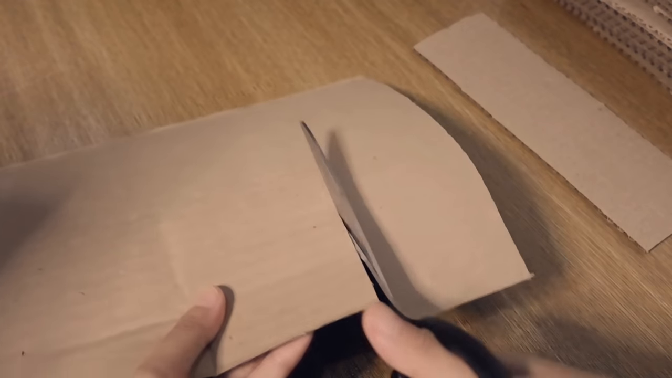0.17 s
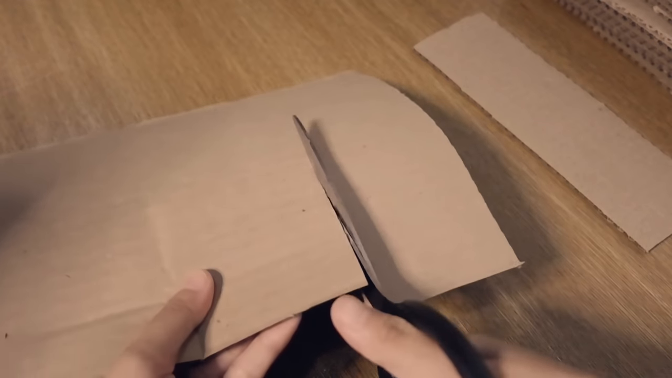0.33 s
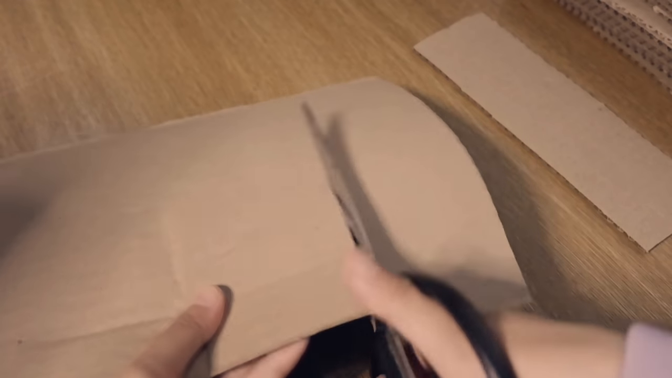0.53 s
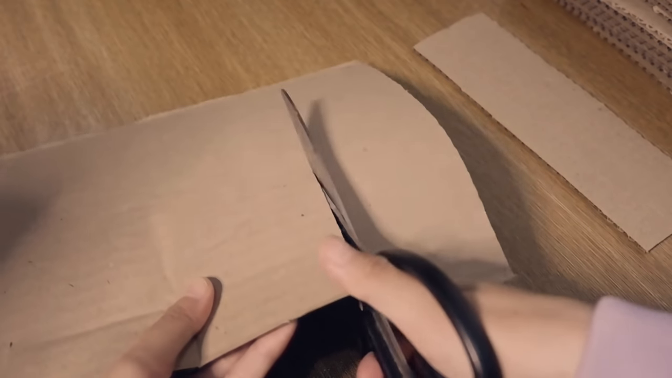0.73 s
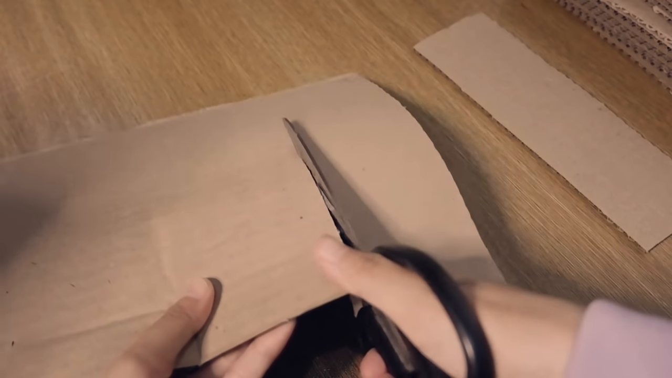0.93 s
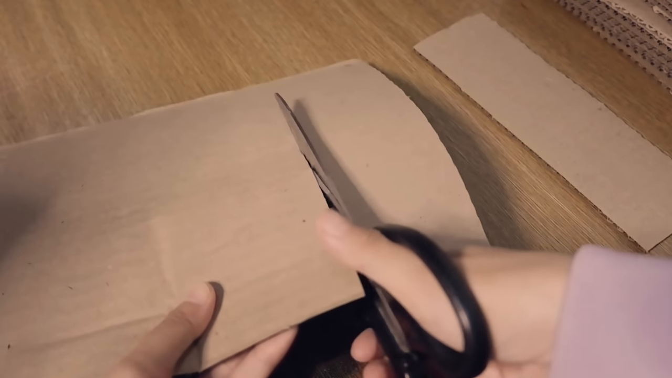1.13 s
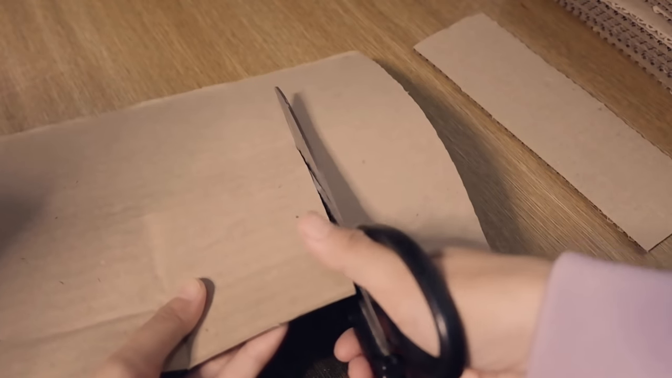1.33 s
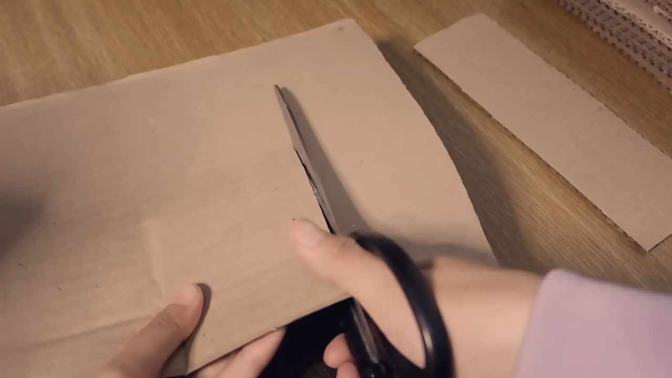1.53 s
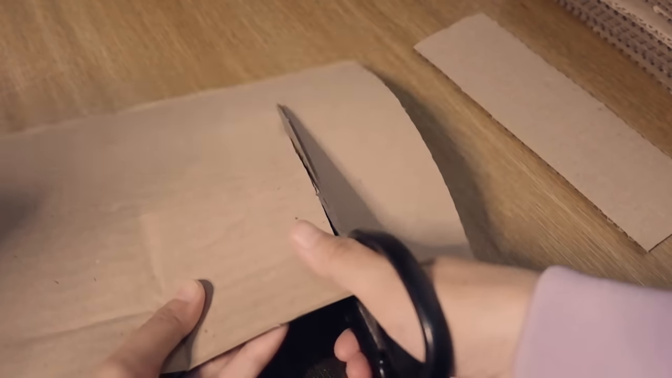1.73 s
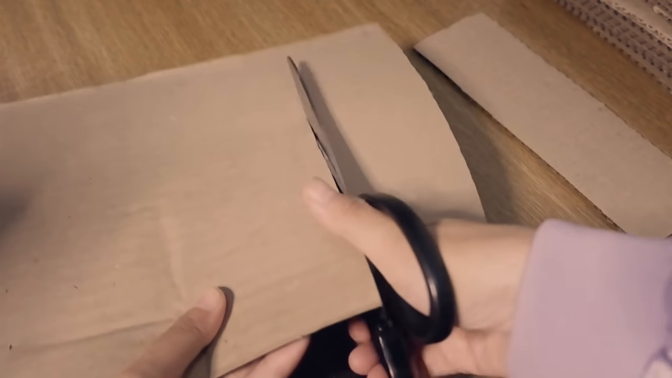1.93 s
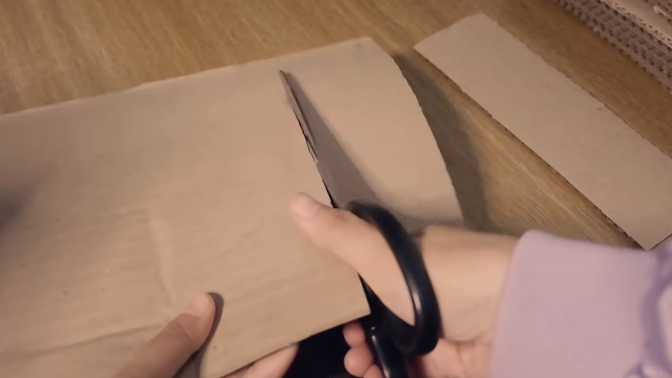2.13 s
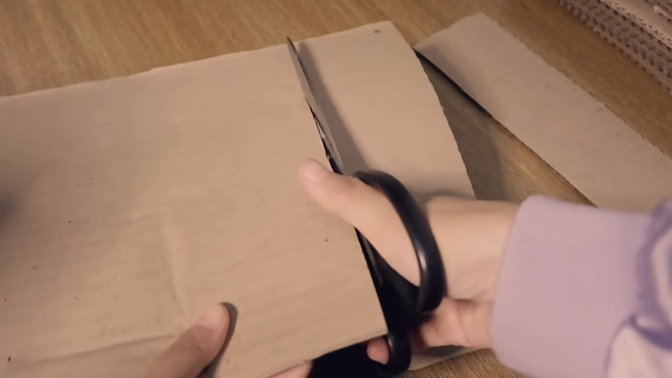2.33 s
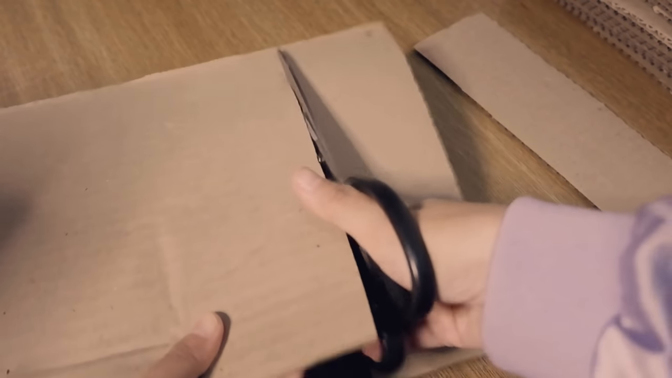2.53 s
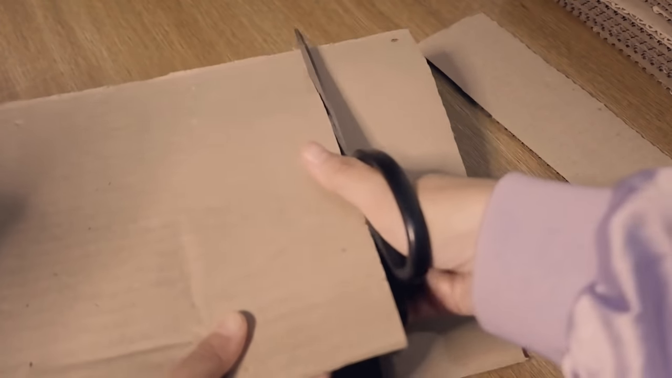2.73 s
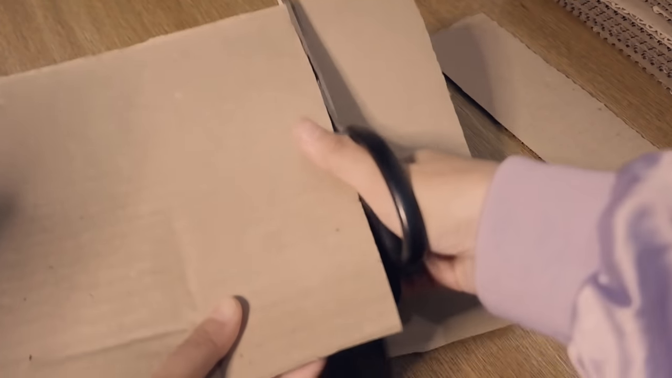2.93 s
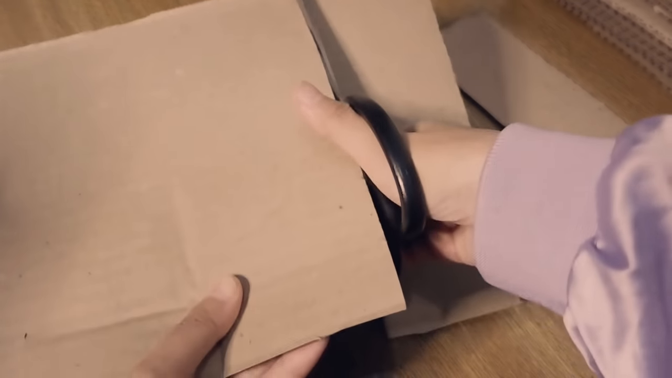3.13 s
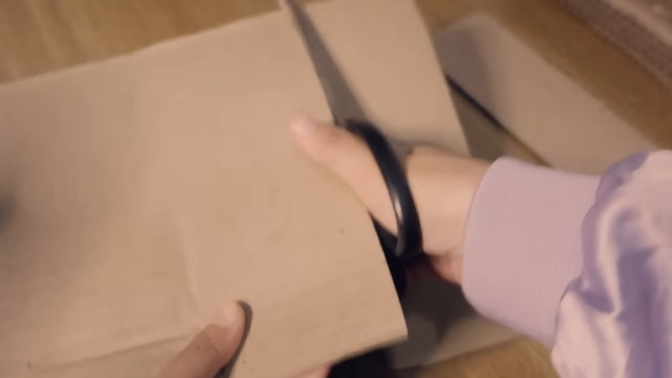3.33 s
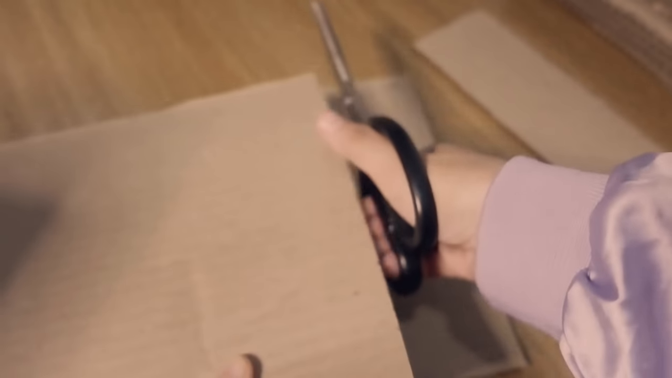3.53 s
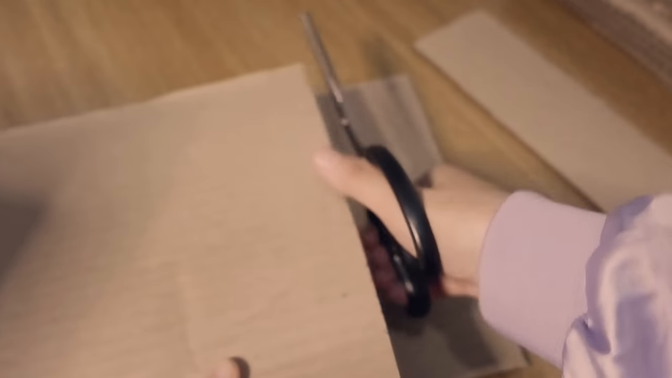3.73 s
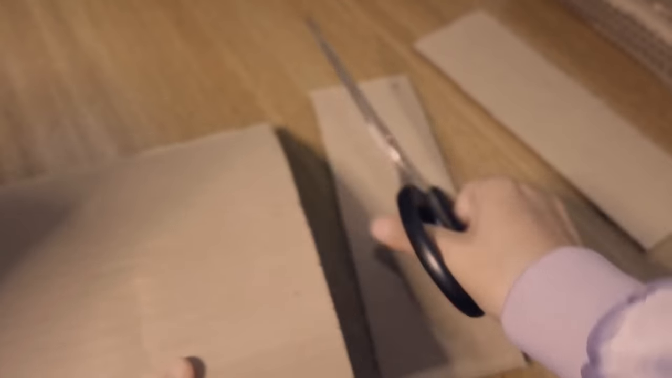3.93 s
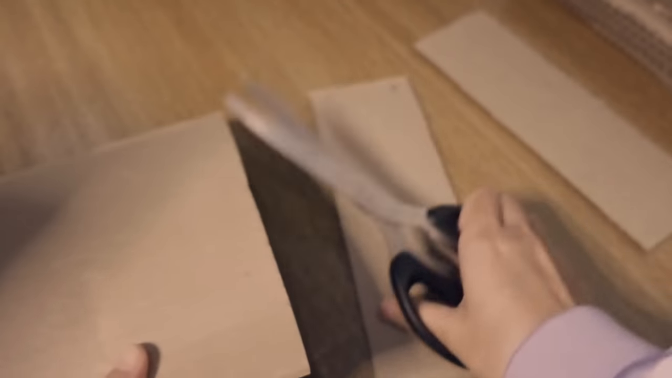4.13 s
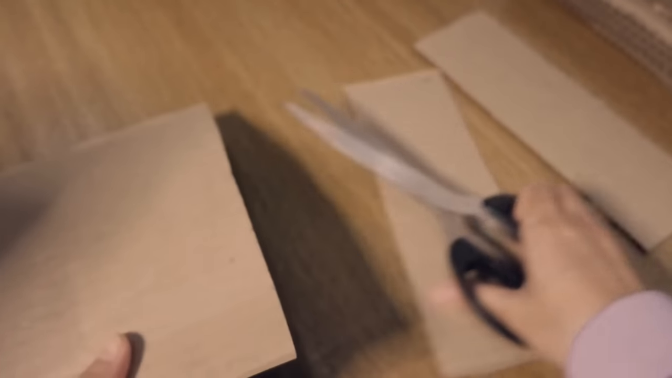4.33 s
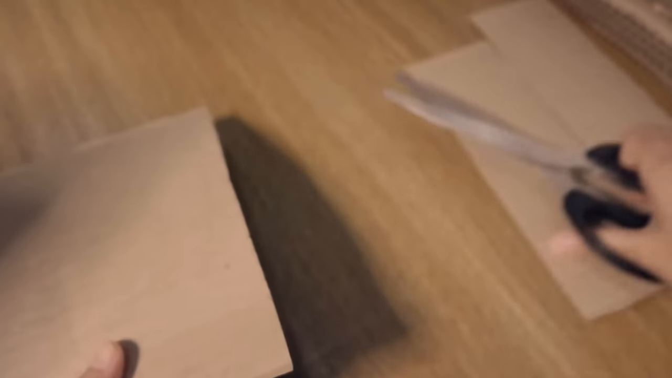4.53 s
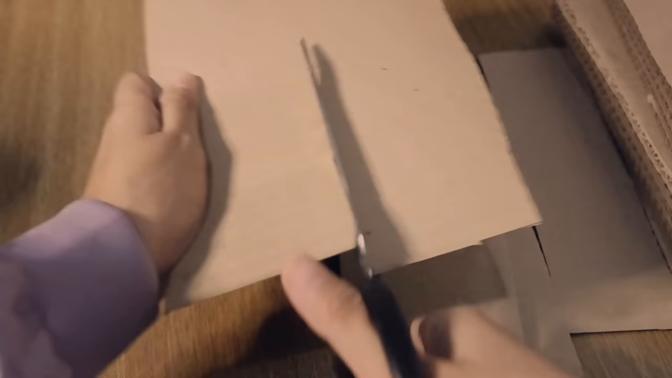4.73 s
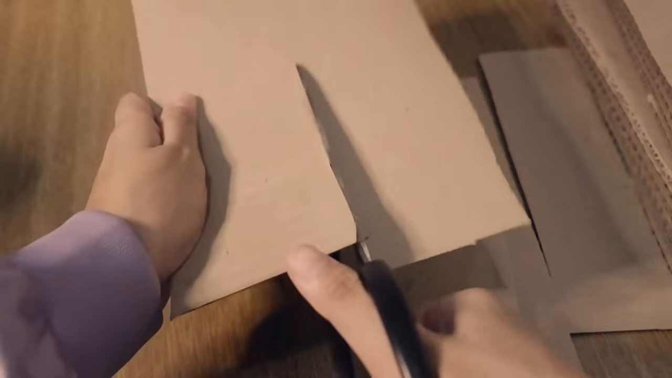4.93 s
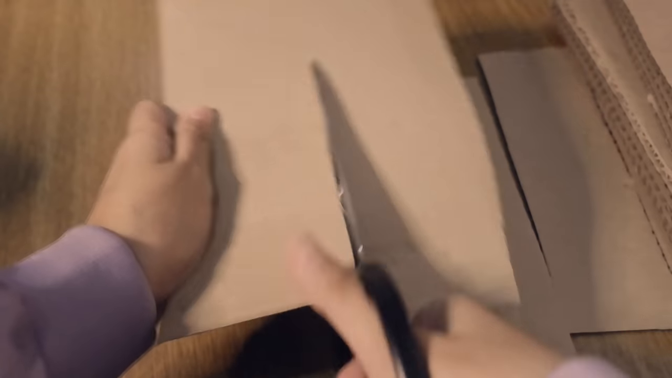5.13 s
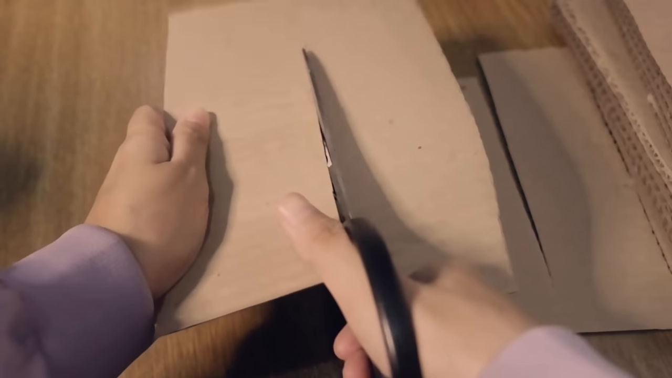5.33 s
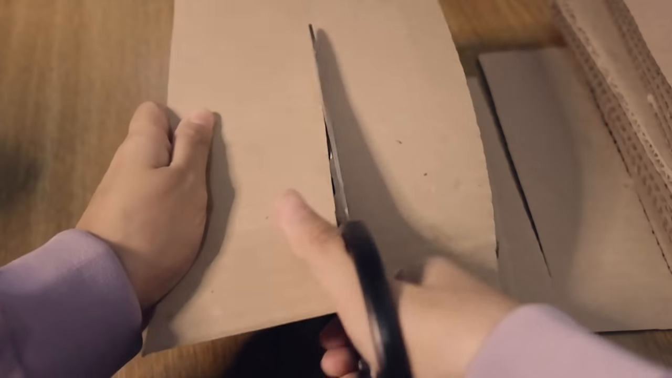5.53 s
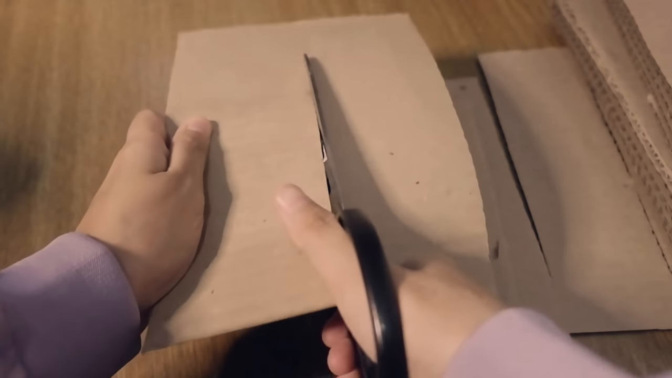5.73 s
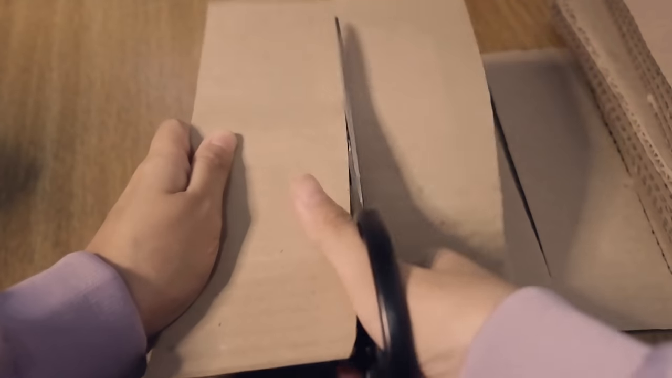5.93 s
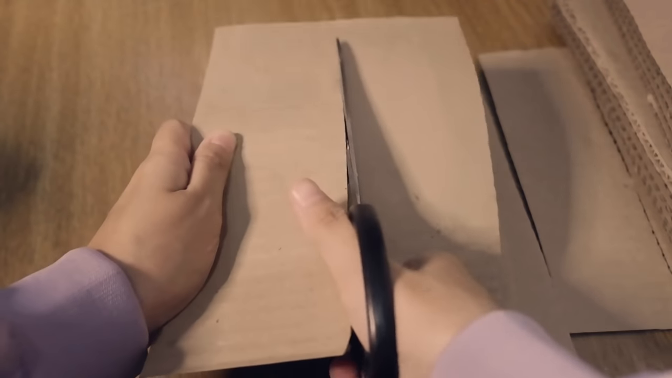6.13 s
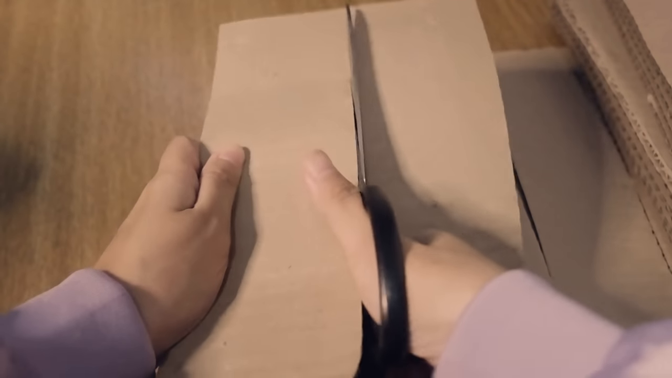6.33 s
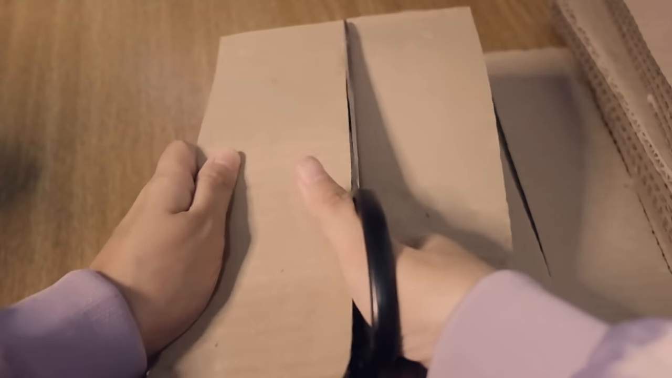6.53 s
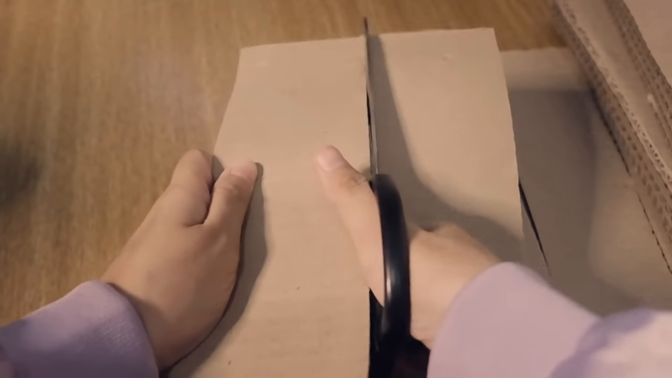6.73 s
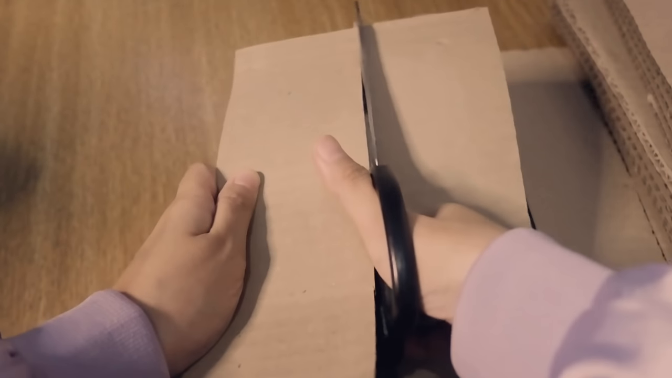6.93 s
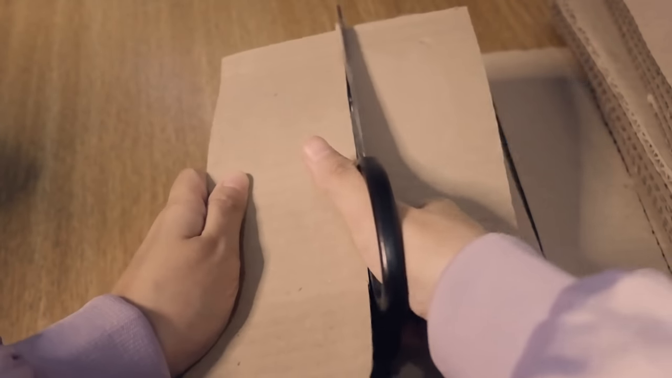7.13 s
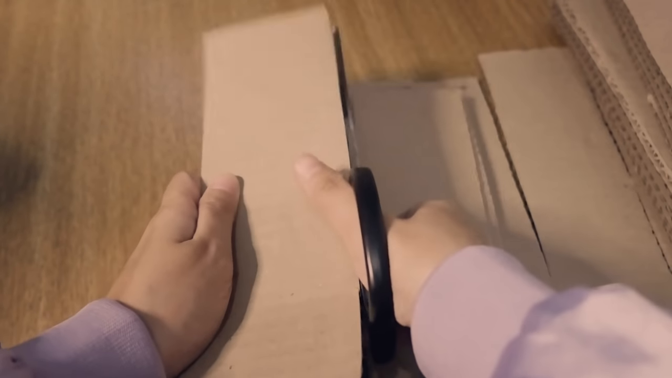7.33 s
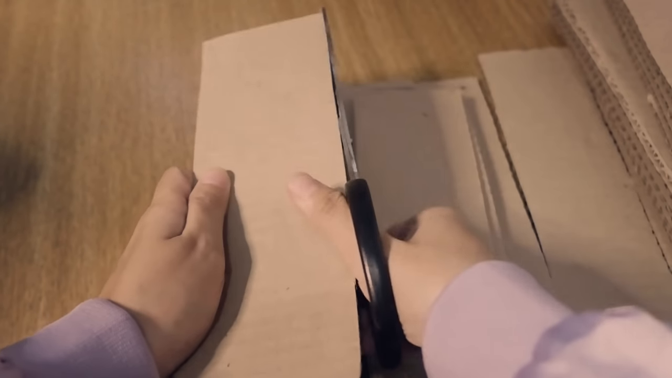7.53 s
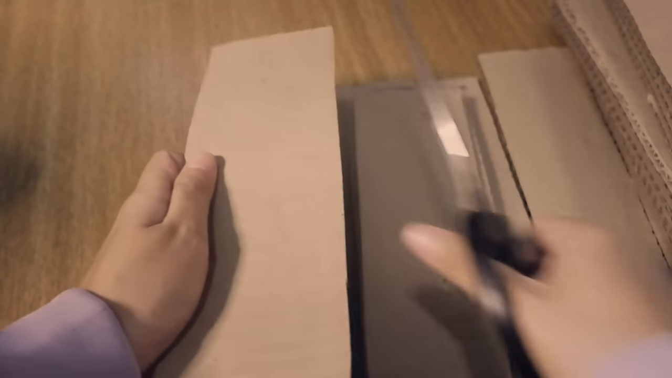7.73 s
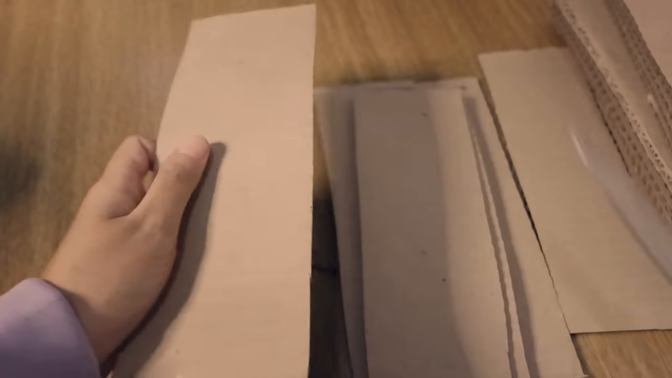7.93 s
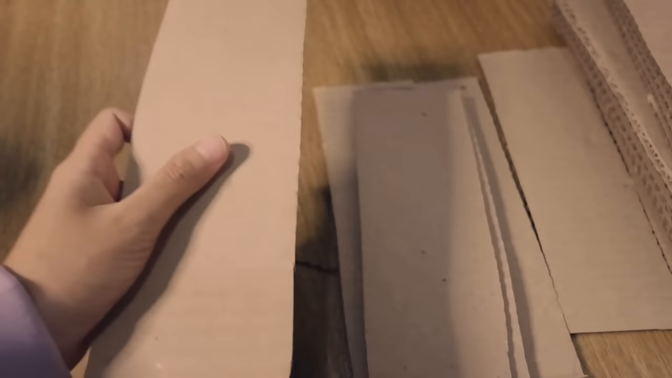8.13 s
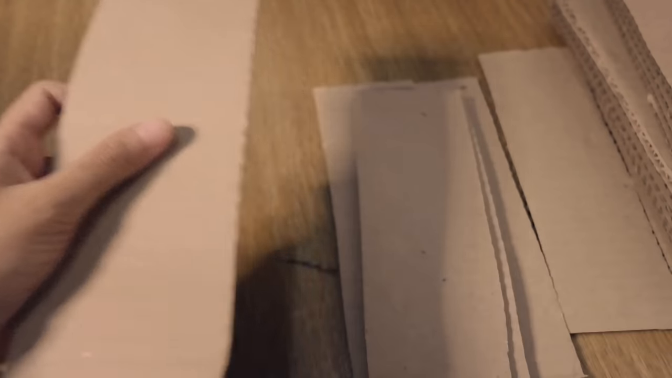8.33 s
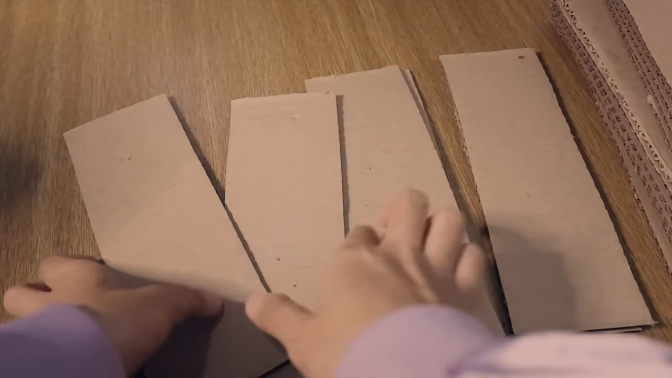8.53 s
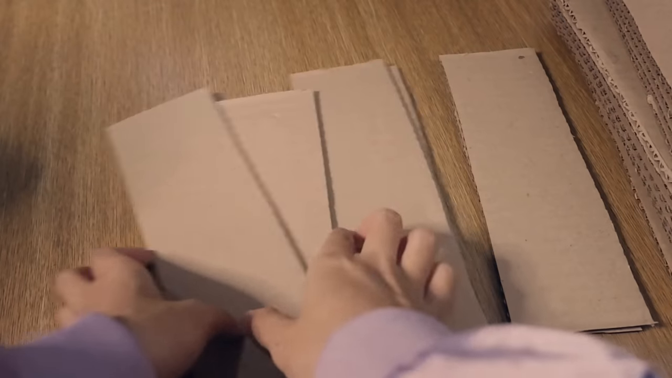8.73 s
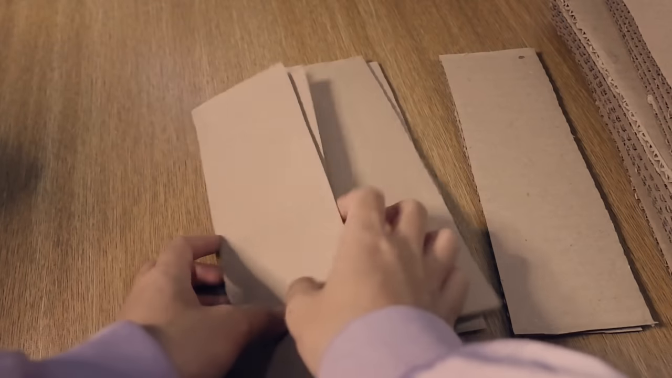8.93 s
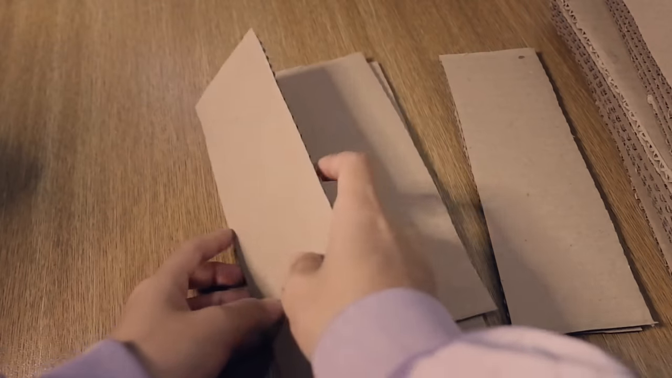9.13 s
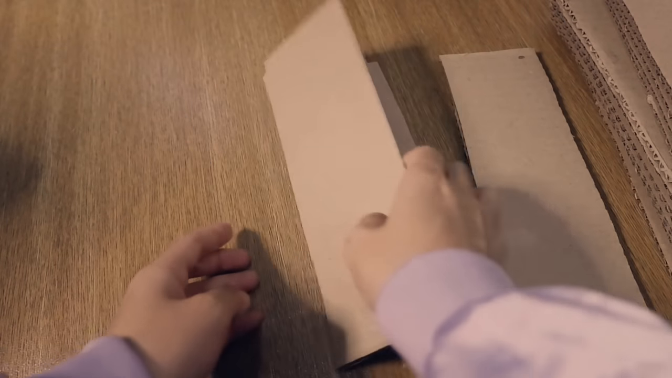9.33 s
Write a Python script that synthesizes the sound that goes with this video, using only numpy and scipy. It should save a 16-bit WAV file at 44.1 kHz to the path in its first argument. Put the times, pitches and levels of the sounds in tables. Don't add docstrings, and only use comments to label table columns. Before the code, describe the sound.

Two runs of cardboard cutting, heard very near and dry. Loud crisp crunches come in bursts about three times a second, sparser at first, with thin fibrous rasps between them. Between the runs the board drags softly across the desk. Blade tips clack sharply at the end of each run. Afterwards light strips land, slide and knock gently, fading to low room rumble and thin steady hiss.

```python
import sys
import numpy as np
from scipy import signal
from scipy.fft import rfft, irfft, next_fast_len
from scipy.io import wavfile

SR = 44100
rng = np.random.default_rng(int(sys.argv[2]) if len(sys.argv) > 2 else 0)


def store_wav(level_fs):
    pcm = np.round(np.clip(np.atleast_2d(level_fs), -1, 1) * 32767)
    wavfile.write(sys.argv[1], SR, pcm.T.astype(np.int16))


def linear_from_db(decibels):
    return 10 ** (np.asarray(decibels, float) / 20)


N = 418068

# pitch_hz, level_db (per Hz)
ROOM_SPECTRUM = [(15, -22), (25, 1), (49, -7.5), (200, -5.5), (344, -11.5), (1100, -9), (2410, -16),
                 (3620, -14.5), (4250, -10.5), (11900, -23), (14800, -18.5), (16000, -41)]
# pitch_hz, likeness (0 to 1)
ROOM_LIKENESS = [(60, 0.7), (240, 0.65), (950, 0.64), (3770, 0.14), (15000, 0.026)]
# time_s, level_db
HANDS = [(0.0, -49), (0.47, -45), (0.69, -50.5), (1.08, -46), (1.43, -50.5), (2.48, -45.5), (3.06, -48),
         (3.85, -54), (4.75, -51.5), (4.91, -46.5), (6.39, -49), (7.79, -52), (9.48, -54.5)]
# start_s, length_s, level_db, pitch_hz
BUMPS = [(0.858, 0.08, -32, 232), (1.603, 0.39, -57, 80), (1.998, 0.13, -55, 74.4), (3.05, 0.45, -55, 177),
         (6.145, 0.13, -42, 212), (6.978, 0.095, -53, 69.5), (7.701, 0.055, -51, 3060),
         (7.713, 0.058, -44.5, 1020), (8.275, 0.13, -42.5, 208), (8.276, 0.13, -47, 3100),
         (8.27, 0.099, -39.5, 5350)]
# pitch_hz, level_db (per Hz)
FIBRE_SPECTRUM = [(76, -51), (130, -22), (296, -7), (379, -5), (726, -6.5), (985, -4.5), (1080, -4),
                  (1920, -1.5), (3350, 3), (3750, -5), (5710, -10.5), (9030, -13), (12500, -31),
                  (16200, -68), (22000, -120)]
# start_s, fastest_s, end_s, fibre_db, flap_db (over the fibre)
SLIDES = [
    (4.272, 4.45, 4.74, -42, -8.5),
    (8.67, 8.722, 8.76, -38.5, 2.5),
    (8.76, 8.83, 9.08, -39, -1.5),
    (8.865, 8.916, 8.8, -42.5, -8),
    (9.025, 9.04, 9.065, -41.5, 5.5),
    (8.956, 9.12, 9.21, -50, 4),
    (9.205, 9.24, 9.23, -45.5, -4.5),
]
# start_s, length_s, level_db, brightness_db
CUTS = [(.364, 0.059, -30.5, -5), (.86, 0.077, -33, 0), (1.711, .056, -29, -0.5),
        (2.069, 0.076, -32.5, 3.5), (2.415, 0.076, -29.5, 0), (2.771, 0.063, -31.5, 0.5),
        (3.405, 0.014, -35, -0.5), (4.937, 0.094, -34.5, 1), (5.353, 0.06, -31, -3),
        (5.724, 0.052, -32, -3), (6.093, 0.061, -32, -2.5), (6.426, 0.072, -33.5, -0.5),
        (6.743, 0.037, -33, 2), (7.239, 0.092, -38, 0), (7.338, 0.089, -44, 8)]
# start_s, length_s, level_db, brightness_db
PUSHES = [(.103, .11, -43.5, -1), (.543, .077, -36.5, -3), (1.061, 0.052, -41, 1.5), (1.862, 0.068, -38, 1),
          (2.217, 0.078, -39.5, -1), (2.54, .14, -41.5, 0.5), (2.973, 0.041, -52, 4),
          (3.084, 0.05, -55.5, 1), (4.732, 0.073, -34, 0), (5.141, 0.09, -34, 0.5), (5.535, 0.06, -39, 1),
          (5.899, 0.096, -38, 4), (6.269, 0.058, -36.5, 1.5), (6.605, 0.06, -34.5, 0),
          (6.94, 0.041, -44.5, -0.5)]
# start_s, length_s, level_db, brightness_db
TOUCHES = [
    (0, 0.021, -48, -6.5),
    (3.488, 0.0098, -38, 5),
    (3.838, 0.043, -62, -20),
    (4.16, .012, -60, 5),
    (8.163, 0.18, -57, 11),
    (8.268, 0.098, -52, -6),
    (9.386, 0.0071, -37, -6),
    (9.454, 0.013, -64, 1),
]
# time_s, clack_db, grind_db, fade_db_per_s
TIPS = [
    (3.3998, -3, -27.5, 247),
    (7.3377, -4.5, -29, 305),
    (8.272, -24, -45, 72),
]
# pitch_hz, width_hz, level_db
STEEL = [(2950, 1800, -1.5), (4430, 310, 6.5), (4970, 170, -5.5), (6600, 380, 2.5)]
# pitch_hz, level_db, ring_s (time to fall 60 dB)
SHEET = [(195, -50, 0.085), (355, -56, 0.017), (490, -59, 0.048), (656, -23, 0.028), (740, -2.5, 0.053),
         (854, -4, 0.01), (1100, 9, 0.012), (1430, 6, 0.0078), (1825, -5, 0.021)]
# pitch_hz, width_hz, level_db
CRACK = [(2310, 970, 9), (2920, 1100, 5), (4220, 67, -2), (4980, 1130, 4.5), (7440, 140, -19.5),
         (8060, 810, -39), (2160, 300, -79)]
# time_s, peak_db, flap_pitch_hz, crack_db (over the flap)
FLUTES = [(0.338, -34.5, 1980, -1), (0.365, -19.5, 867, -7), (0.389, -3.5, 760, -14),
          (0.415, -10, 740, -20), (0.447, -12, 692, -14), (0.485, -24, 1150, -10),
          (0.817, -11, 1220, -22), (0.831, -17, 1170, -20), (0.863, -2.5, 804, -14.5),
          (0.883, -3, 750, -13.5), (0.907, -16.5, 732, -18), (0.937, -9, 740, -9.5),
          (1.718, -4.5, 1120, -6.5), (1.734, -6, 1080, -6.5), (1.766, -11.5, 1010, -7.5),
          (2.075, -17.5, 553, 2), (2.097, -5.5, 402, -6), (2.123, -11, 1240, -5.5),
          (2.138, -11, 1430, -7.5), (2.42, -25.5, 832, -1), (2.439, -7.5, 1350, -6.5),
          (2.464, 2, 1390, -13), (2.547, -10.5, 1360, -3.5), (2.777, -3, 1390, -10),
          (2.823, -8, 755, -12.5), (3.374, -10, 2640, -14), (3.394, -3, 720, -9.5),
          (3.415, -23, 1390, -22),
          (4.937, -18, 735, -7), (4.966, 0, 604, -15), (4.988, -1.5, 590, -22),
                       (5.012, -2, 1000, -13), (5.358, -13.5, 1160, -10), (5.374, 0, 915, -14.5),
                       (5.403, -2, 930, -13.5), (5.702, -23.5, 805, -14), (5.73, -7, 1170, -13.5),
                       (5.743, -16, 1160, -26), (5.765, -0.5, 990, -24), (5.78, -13, 900, -16),
                       (6.098, -12, 1010, -12), (6.116, 2, 1000, -18), (6.128, -10, 1390, -30),
                       (6.16, -6, 980, -23.5), (6.41, -19, 490, -15), (6.432, -10.5, 930, -19),
                       (6.445, -8, 603, -7.5), (6.485, 0, 796, -22.5), (6.504, -16.5, 740, -23),
                       (6.75, -7.5, 920, -4.5), (6.772, -11, 870, -15), (6.793, -7.5, 864, -18),
                       (7.18, -18, 930, -13.5), (7.246, -12, 1070, -11), (7.275, -11, 1030, -13.5),
                       (7.291, -2, 1100, -17), (7.334, -5.5, 1430, -3.5)]
# time_s, peak_db, flap_pitch_hz, crack_db (over the flap)
CATCHES = [(0.273, -29, 1100, -17), (0.571, -16.5, 730, -17), (0.591, -14.5, 1340, -20),
           (0.606, -16.5, 810, -5.5), (1.134, -20.5, 773, -20), (1.317, -30, 594, -15.5),
           (1.449, -33, 590, -36), (1.693, -19, 344, -12), (1.823, -30, 1110, -11), (1.902, -18, 460, -23),
           (2.27, -25, 360, -17), (2.352, -19.5, 794, -11.5), (2.37, -23, 1560, -30),
           (2.589, -19, 1390, -31), (2.718, -20.5, 760, -15), (2.976, -33, 1430, -14),
           (4.767, -14, 369, -18), (5.194, -15.5, 740, -8), (5.328, -29, 1180, -32),
           (5.492, -18, 1060, -11), (5.885, -22, 930, -9), (5.985, -30, 2020, 1), (6.346, -23, 494, -29),
           (6.626, -15, 865, -22), (6.644, -16, 1040, -12), (6.858, -27, 895, -9), (6.903, -29, 385, -13),
           (7.024, -33.5, 930, -7)]
# time_s, peak_db, flap_pitch_hz, crack_db (over the flap)
KNOCKS = [(3.499, -19, 2700, 1.5), (7.391, -26, 1370, 4), (7.424, -21.5, 1050, -32),
          (8.169, -31.5, 1020, -2), (8.212, -36.5, 2920, -3), (8.235, -29, 1100, -4.5),
          (8.275, -33.5, 2660, 7), (8.289, -25.5, 356, -6), (8.341, -21, 2840, -12),
          (8.947, -31.5, 1297, -30), (8.995, -28, 1120, 0), (9.029, -27.5, 1360, -10),
          (9.04, -31.5, 1440, -8), (9.083, -24.5, 1470, -12), (9.229, -36, 1730, 0),
          (9.391, -18.5, 1358, -3.5), (9.406, -22, 2200, -7)]

# (sheet dB, flap dB, fibre dB, edge hiss dB)
CUT_DB, PUSH_DB, TOUCH_DB = (-2, 2, -2, -5), (-3.6, -1.8, -0.19, 0.79), (-11.5, -2, 3.5, -1.5)
BRIGHT_SHARE = (-1.08, -0.28, .3, 0.79)
CUT_RISE_S, CUT_FADE_S, PUSH_RISE_S, PUSH_FADE_S = 0.0078, 0.3, 0.019, 0.23
SLIDE_ENDS_DB, SLIDE_HISS_DB = -13, -2.5
THUD_DB, THUD_FOLLOWS, HISS_DB = -62.5, 0.22, -51.5
DUCK_DB, DUCK_AFTER_S, DUCK_S = 4, .22, .1
BUMP_WIDTH = 0.13
TEAR_MS, TEAR_MS_PER_DB = 5.6, .02
HUSH_S = 8.412
TOP_HZ = 16300


def rms_one(x):
    return x / np.sqrt(np.mean(x ** 2) + 1e-20)


def peak_one(x):
    return x / np.abs(x).max()


def filtered(x, order, hz, kind="low"):
    return signal.sosfilt(signal.butter(order, hz, kind, fs=SR, output="sos"), x)


def at_hz(points, hz):
    table_hz, value = np.array(points).T[:2]
    return np.interp(np.log(hz), np.log(table_hz), value)


def drift(rate_hz):
    r = np.exp(-80 * np.pi * rate_hz / SR)
    noise = rng.standard_normal(N // 40 + 2002)
    slow = signal.lfilter([1], [1, -2 * r, r * r], noise)[2000:]
    return np.interp(np.arange(N) / 40, np.arange(len(slow)), rms_one(slow))


def ring(force, hz, t60):
    r = linear_from_db(-60 / (max(t60, .003) * SR))
    w = 2 * np.pi * hz / SR
    return signal.lfilter([0, np.sin(w)], [1, -2 * r * np.cos(w), r * r], force)


def coloured(sources, spectrum, low_hz, high_hz, likeness, patchy_db):
    out = 0
    edges = np.geomspace(low_hz, high_hz, 2 + int(2.4 * np.log2(high_hz / low_hz)))
    for k, (low, high) in enumerate(zip(edges, edges[1:])):
        mid, side = filtered(sources[k % 2], 2, [low, high], "band")
        hz = np.sqrt(low * high)
        alike = np.clip(at_hz(likeness, hz), 0, 1)
        gain = linear_from_db(at_hz(spectrum, hz) + patchy_db * drift(12.7))
        out = out + gain * (np.sqrt(1 + alike) * mid + np.sqrt(1 - alike) * side * [[1], [-1]])
    return rms_one(out)


def room_tone():
    white = rng.standard_normal((2, 2, N))
    t = np.arange(N) / SR
    hand_s, hand_db = np.transpose(HANDS)
    shift_db = np.interp(t, hand_s, hand_db)
    thud_db = THUD_DB + THUD_FOLLOWS * (shift_db - shift_db.mean())
    duck_db = sum(DUCK_DB * np.exp(-((t - s - DUCK_AFTER_S) / DUCK_S) ** 2) for s, *rest in TIPS)
    thud = coloured(white, ROOM_SPECTRUM, 56.0, 123, ROOM_LIKENESS, patchy_db=4.0)
    shift = coloured(white, ROOM_SPECTRUM, 128.9, 968, ROOM_LIKENESS, patchy_db=3.5)
    hiss = coloured(white, ROOM_SPECTRUM, 900, 16200, ROOM_LIKENESS, patchy_db=.15)
    return linear_from_db(thud_db) * thud + linear_from_db(shift_db) * shift + linear_from_db(HISS_DB - duck_db) * hiss


def room(x, t60=0.099, cut_hz=5000):
    size = next_fast_len(N + SR)
    w = 2 * np.pi * np.arange(size // 2 + 1) / size
    dull = 1 / (1 + 1j * w * SR / (2 * np.pi * cut_hz))
    lags = rng.uniform(0.0071, .03, (2, 6)) * SR
    loops = [[linear_from_db(-60 * d / SR / t60) * dull * np.exp(-1j * w * d) for d in side] for side in lags]
    answer = np.array([sum(g / (1 - g) * (-1) ** k for k, g in enumerate(side)) for side in loops])
    return irfft(rfft(x.mean(axis=0), size) * answer, size)[:, :N]


def bumps():
    out = np.zeros(N)
    for s, length, level_db, hz in BUMPS:
        count, start = round(length * SR), round(s * SR)
        t60 = 2.2 / (BUMP_WIDTH * hz)
        shake = ring(rng.standard_normal(SR // 2), hz, t60)
        shake = rms_one(ring(shake, hz, t60 / 3))[-count:]
        swell = np.sin(np.pi * (np.arange(count) / count) ** 0.4) ** .7
        out[start:start + count] += linear_from_db(level_db) * shake * swell
    return out


def breaks():
    return sorted(FLUTES + CATCHES + KNOCKS)


def sticking():
    hard = [(s, peak_db) for s, peak_db, *rest in breaks() if peak_db > -17]
    hard = np.array(hard + [(99, 0)])
    t = np.arange(N) / SR
    next_s, peak_db = hard[np.searchsorted(hard[:, 0], t)].T
    return linear_from_db(-np.minimum(2 * (peak_db + 17), 18) * np.exp((t - next_s) / .008))


def stroke_levels():
    gains, t = np.zeros((6, N)), np.arange(N) / SR
    kinds = ((CUTS, CUT_DB, CUT_RISE_S, CUT_FADE_S),
             (PUSHES, PUSH_DB, PUSH_RISE_S, PUSH_FADE_S),
             (TOUCHES, TOUCH_DB, CUT_RISE_S, CUT_FADE_S))
    for rows, kind_db, rise, fade in kinds:
        for s, length, level_db, bright_db in rows:
            part = slice(max(round(s * SR), 0), round((s + length + .3) * SR))
            corners_s = [0, min(rise, length / 2), 0.89 * length, length, length + fade]
            shape_db = np.interp(t[part] - s, corners_s, [-7, -1.5, 2.5, -1.8, -68])
            band_db = level_db + np.array(kind_db) + bright_db * np.array(BRIGHT_SHARE)
            gains[:4, part] += linear_from_db(band_db[:, None] + shape_db)
    for start, fastest, end, fibre_db, flap_db in SLIDES:
        corners_s = [start - .05, start, fastest, end, end + .05]
        shape_db = np.interp(t, corners_s, [-45, SLIDE_ENDS_DB, 0, SLIDE_ENDS_DB, -40])
        gains[[5, 2, 4]] += linear_from_db(fibre_db + shape_db) * linear_from_db([[flap_db], [0], [SLIDE_HISS_DB]])
    return gains * sticking()


def grains(per_s, spread_db, clump_db):
    sizes = linear_from_db(spread_db * np.minimum(rng.exponential(1, N), 5))
    born = rng.random(N) < per_s * linear_from_db(clump_db * drift(40)) / SR
    return rms_one(sizes * born) * rng.standard_normal((2, 2, N)) + 1e-9


def rubbing():
    near = [(300, 1.0), (2000, 1.0), (9000, 0.42)]      # pitch_hz, left-right likeness
    coarse = grains(per_s=1800, spread_db=2.5, clump_db=3)
    fine = grains(per_s=9000, spread_db=0.5, clump_db=1.5)
    sheet = coloured(coarse, FIBRE_SPECTRUM, 128, 1008, near, patchy_db=3.5) * linear_from_db([[.7], [-.7]])
    flap = coloured(coarse, FIBRE_SPECTRUM, 1202, 1796, near, patchy_db=1.0) * linear_from_db([[.4], [-.4]])
    fibre = coloured(fine, FIBRE_SPECTRUM, 1930, 4160, near, patchy_db=1.0)
    edge = coloured(fine, FIBRE_SPECTRUM, 3910, 12870, near, patchy_db=1.5) * linear_from_db([[-.6], [.6]])
    desk = rms_one(filtered(edge, 2, 6500))
    rasp = coloured(coarse, FIBRE_SPECTRUM, 1100, 1950, near, patchy_db=1.5)
    bands = [sheet, flap, fibre, edge, desk, rasp]
    sheet, flap, fibre, edge, desk, rasp = [gain * band for gain, band in zip(stroke_levels(), bands)]
    ringing = sum(linear_from_db(db) * ring(sheet + flap, hz, 0.71 * t60) / np.sqrt(t60 * SR)
                  for hz, db, t60 in SHEET)
    return sheet + flap + linear_from_db(-8.5) * ringing + fibre + edge + desk + rasp


def blades():
    force, t = np.zeros(N), np.arange(N) / SR
    for s, clack_db, grind_db, fade_db in TIPS:
        after = np.maximum(t - s, 0)
        clack = linear_from_db(clack_db - 17000 * after)
        grind = linear_from_db(grind_db - fade_db * after) * (after > .012)
        force += (t >= s) * (clack + grind)
    mid, side = rng.standard_normal((2, N))
    force = force * (mid + 0.29 * side * [[1], [-1]]) + 1e-12
    steel = sum(linear_from_db(db) * np.sqrt(width / 1000) * ring(force, hz, 1.75 / width)
                for hz, width, db in STEEL)
    blunt = filtered(force, 4, 9500)
    return signal.lfilter([1, -1], [1, -.85], linear_from_db(-8.0) * steel + linear_from_db(-20.5) * blunt)


def snaps():
    count = 3000
    out, t = np.zeros((2, N + count)), np.arange(count) / SR
    thin = signal.butter(2, 1150, "high", fs=SR)
    for s, peak_db, flap_hz, crack_db in breaks():
        tear_s = (TEAR_MS + TEAR_MS_PER_DB * peak_db) * .001
        slips = rng.laplace(size=count) * (rng.random(count) < .3)
        slips[3] = 2.2
        force = slips * np.minimum(.45 + t / 0.0034, 1) * np.exp(-(t / tear_s) ** 2)
        push = signal.lfilter([.06, -.055], [1, -1.5, .5625], force)
        modes = linear_from_db(rng.normal(0, 3, len(SHEET)))
        sheet = sum(m * linear_from_db(db) * ring(push, hz, t60) for m, (hz, db, t60) in zip(modes, SHEET))
        small = signal.butter(2, .55 * flap_hz, "high", fs=SR)
        flap = signal.lfilter(*small, ring(push, flap_hz, 16.0 / flap_hz))
        sheet_db = -10 + min(peak_db + 15, 0)
        body = peak_one(flap + linear_from_db(sheet_db) * sheet)
        tints = linear_from_db(rng.normal(0, 3.2, len(CRACK)) + rng.normal(0, 1.8, (2, len(CRACK))))
        shift = 1 + .07 * rng.standard_normal(len(CRACK))
        bands = [linear_from_db(db) * np.sqrt(width) * ring(force, hz * k, 2.2 / width)
                 for k, (hz, width, db) in zip(shift, CRACK)]
        crack = peak_one(signal.lfilter(*thin, tints @ bands))
        snap = body * linear_from_db([[.7], [-.7]]) + linear_from_db(crack_db + 9.5) * crack
        at = round(s * SR)
        out[:, at:at + count] += linear_from_db(peak_db - 2.0) * snap
    return out[:, :N]


def scene():
    cardboard = filtered(snaps() + rubbing(), 4, [215, 11500], "band")
    close = cardboard + blades()
    close = close + linear_from_db(-18.0) * room(close)
    t = np.arange(N) / SR
    hushed = (t > HUSH_S) & (t < HUSH_S + .2)
    return close * ~hushed + room_tone() + bumps()


def low_pass(x):
    return signal.sosfilt(signal.butter(12, 16290, fs=SR, output="sos"), x)


def record(dry):
    cut = signal.sosfilt(signal.cheby2(12, 70, TOP_HZ, fs=SR, output="sos"), dry)
    mix = np.clip(cut, -1, 1)
    return low_pass(mix)


dry = scene()
out = record(dry)
store_wav(out)
```